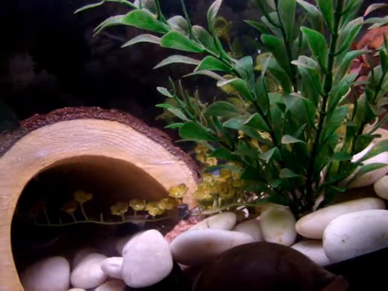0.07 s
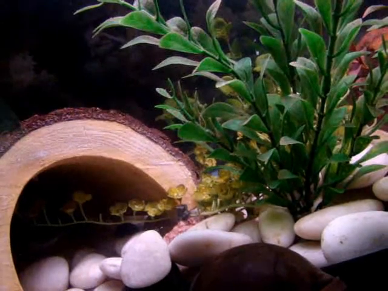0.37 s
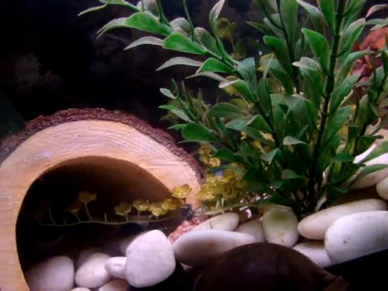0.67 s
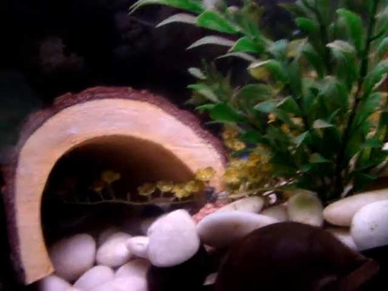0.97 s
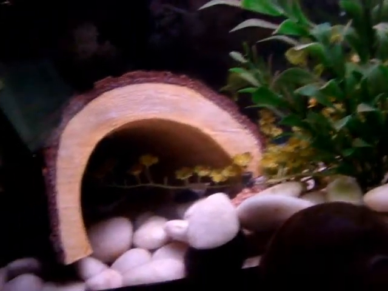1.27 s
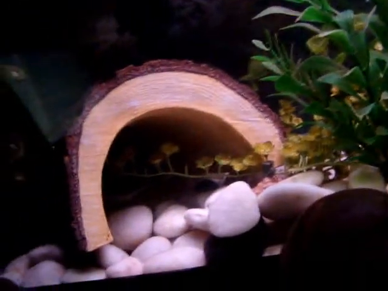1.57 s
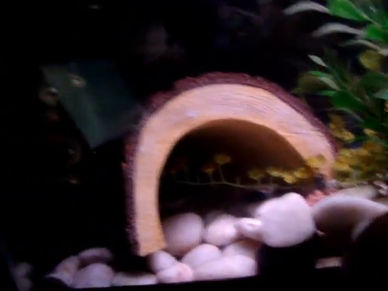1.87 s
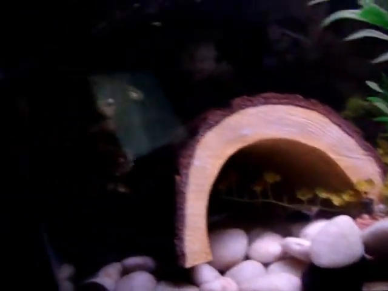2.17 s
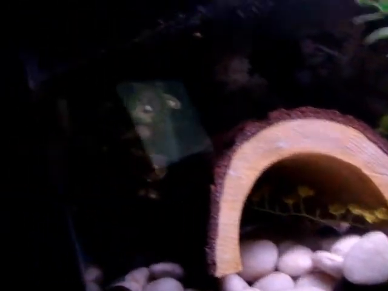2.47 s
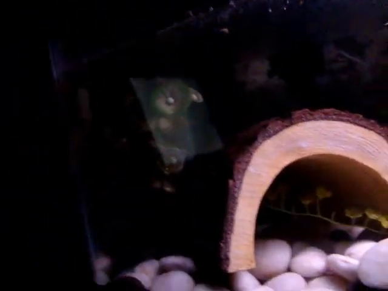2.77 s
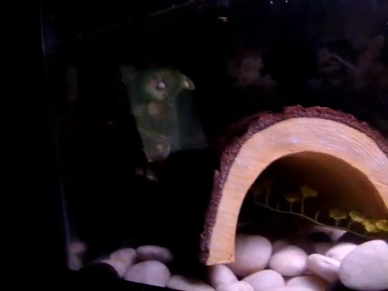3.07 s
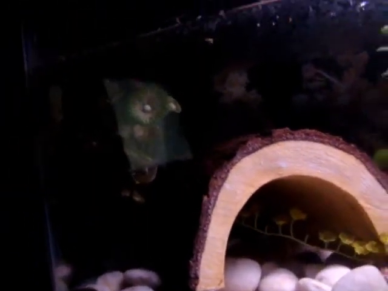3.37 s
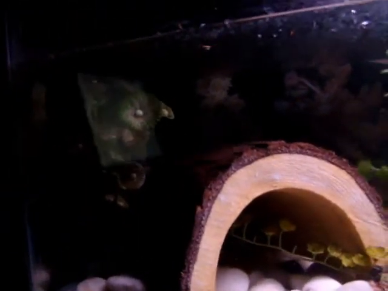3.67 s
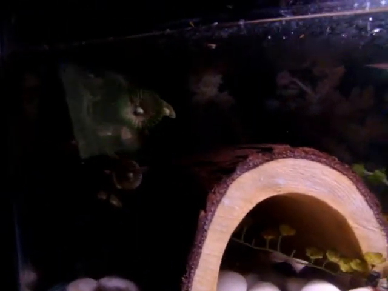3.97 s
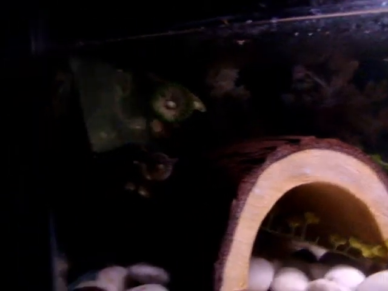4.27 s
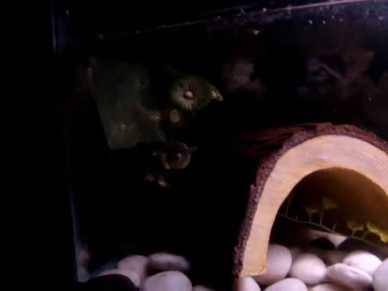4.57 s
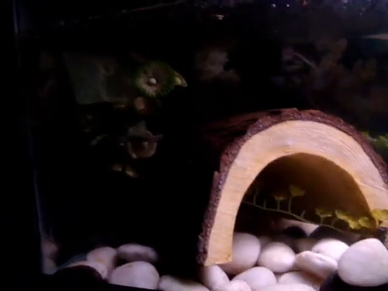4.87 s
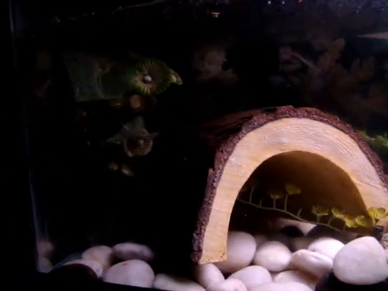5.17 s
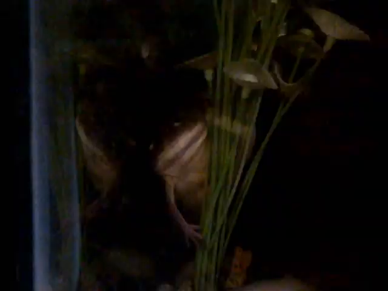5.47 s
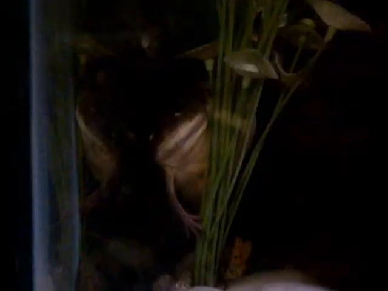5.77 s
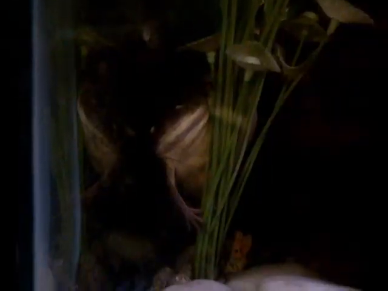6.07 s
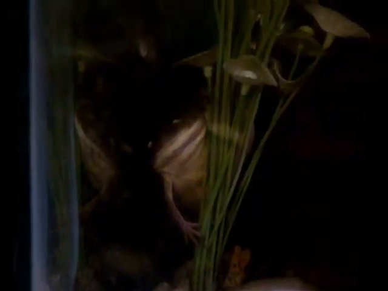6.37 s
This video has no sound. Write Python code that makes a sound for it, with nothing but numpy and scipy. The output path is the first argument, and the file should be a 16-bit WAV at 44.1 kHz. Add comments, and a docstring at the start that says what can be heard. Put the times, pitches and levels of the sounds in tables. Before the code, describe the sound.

Soft hiss and a low electric hum run throughout in a small room. Right away, aquarium frogs call with four brief, rattling trills, roughly one a second, each quickening and growing louder. Scattered taps and small clicks join from the second trill on. Near the end come the loudest sounds, a cluster of plastic clicks and knocks right at the handheld microphone and one sharp tap in the room.

```python
"""Hiss and mains hum lie under an aquarium in a small room, and a hand settles on a camera's case.
Clawed frogs call at once: four accelerating trills, about a second apart, each snap of the larynx
ringing the tank and the room. From the second trill on, taps sound in the room and the case clicks;
after five seconds the grip shifts, the case rattles and knocks hardest, and the level dips briefly.
All along, a quick wobble of the recorder's sampling mirrors every sound faintly into the high treble."""
import sys
import numpy as np
from scipy import signal
from scipy.fft import rfft, irfft, next_fast_len
from scipy.io import wavfile
from scipy.ndimage import uniform_filter1d

SR = 44100
rng = np.random.default_rng(int(sys.argv[2]) if len(sys.argv) > 2 else 0)


def materialize(psi):
    """Save the field psi as 16-bit PCM at rate SR to the path in sys.argv[1].

    A 1-D psi becomes a single channel; in a 2-D psi each row is a channel.
    """
    bounded = np.clip(np.atleast_2d(psi).T, -1, 1)
    quanta = np.round(bounded * 32767).astype(np.int16)
    wavfile.write(sys.argv[1], SR, quanta)


N = 292383
TIME = np.arange(N) / SR
HIT_TIME = TIME[:SR // 3]

# Tone of the room air and microphone hiss. Each row: frequency in Hz, relative level in dB.
AIR_CURVE = [(20, -21), (55, -13), (85, -17), (150, -6.5), (210, -4.5), (255, 1.5), (320, -2), (390, 0.5),
             (550, -2), (1100, -3), (1800, -7), (3500, -12), (6000, -15), (9900, -19.5)]
# The pump's mains hum and a faint electrical whine. Each row: frequency in Hz, rms level in dB.
HUM_TONES = [(120, -75.5), (240, -67), (360, -70), (720, -73.5), (5611, -78), (8000, -79)]
# Shifts of the grip. Each row: middle in seconds, half length in seconds, level in dB.
GRIP_SHIFTS = [(.01, 0.016, -47.5), (2.722, 0.066, -53), (5.355, 0.17, -53), (6.165, 0.13, -51),
               (6.57, 0.22, -52.5)]
# Ring of the camera case. Each row: frequency in Hz, relative level in dB, 60 dB decay in seconds.
CASE_RESONANCES = [(366, -17.5, 0.075), (598, -1.5, 0.016), (770, -7, 0.048), (1046, 8, 0.016),
                   (1246, -22, .25), (1430, -25, 0.31), (1465, 9.5, 0.022), (1677, -7.5, 0.046),
                   (2240, -10, 0.0056), (2768, 11.5, 0.015), (3160, -5, 0.033), (3740, 1.5, 0.016),
                   (5270, 8.5, 0.0062), (5750, 0, 0.012), (9400, -18, 0.01)]
# Soft bumps of the hand. Each row: start in seconds, level in dB.
HAND_BUMPS = [(0.021, -48), (.073, -39), (.086, -44), (2.922, -46), (2.985, -47), (3.027, -49),
              (3.077, -42)]
# Finger slides. Each row: middle and half length in seconds, centre and width in Hz, level in dB.
FINGER_SLIDES = [(2.94, 0.022, 1070, 1190, -51), (4.432, 0.05, 3400, 4600, -50.5),
                 (5.256, 0.0063, 5400, 1530, -40)]
# The frogs' trills. Each row: start, length and first gap in seconds, ratio of each gap to the one
# before, full level in dB.
FROG_TRILLS = [(.1095, .236, .0521, .8234, -34.5), (1.0585, .273, .0607, .7878, -33),
               (2.1995, .258, .0544, .8041, -34), (3.3305, .191, .0439, .8054, -32.5)]
# The note of a frog's snap, then the tank's modes. Each row: frequency in Hz, relative level in dB,
# 60 dB decay in seconds.
SNAP_AND_TANK_MODES = [(1907, 7.5, 0.006), (1806, -16.5, 0.058), (1744, -27, 0.079), (2090, -32.5, 0.13),
                       (2700, -30, 0.021)]
# Taps in the room. Each row: start in seconds, level in dB, centre and width in Hz, reverb send in dB.
ROOM_TAPS = [(1.174, -42.5, 2600, 1800, -8), (2.611, -32, 1440, 1900, -14), (2.671, -28.5, 1160, 1010, -3),
             (2.966, -34, 2360, 1800, -12), (3.480, -26.5, 1180, 553, 4), (3.488, -36.5, 1200, 500, 3),
             (4.537, -37.5, 5030, 5000, 2), (6.220, -15, 1860, 5000, -0.5), (6.327, -34.5, 3600, 4020, -17),
             (6.334, -32, 3600, 4000, -20), (6.491, -37, 2600, 4000, -20)]
# Tone of the tapped object. Each row: frequency in Hz, relative level in dB.
TAP_CURVE = [(65, -63), (110, -30), (235, 8.5), (289, 2.5), (632, -1), (776, 0.5), (1470, 2.5), (1590, 3),
             (2170, -1.5), (5590, -5.5), (11700, -21), (15000, -43)]
# Clicks of the case. Each row: start in seconds, level in dB, hardness in dB (more is brighter).
CASE_HITS = [(1.412, -40.5, -9), (1.479, -38.5, -12), (1.796, -24, -19), (2.211, -38, -7),
             (3.013, -36.5, -14), (5.305, -30.5, -22), (5.317, -34, -15), (5.349, -22, -18),
             (5.392, -9, 1.5), (5.432, -23, -11), (5.539, -6.5, -16), (5.937, -33, -14),
             (5.973, -32.5, -18), (6.156, -44, -17), (6.303, -14, -20), (6.585, -30, -21)]


def undb(db):
    """Decibels to gain."""
    return 10 ** (np.asarray(db) / 20)


def unit(x):
    """Scale to rms 1."""
    return x / np.sqrt(np.mean(x ** 2))


def unit_peak(x):
    """Scale a hit so that its envelope peaks at 1."""
    return x / np.sqrt(2 * uniform_filter1d(x ** 2, SR // 1000, mode="constant").max())


def add(out, s, sound):
    """Mix a sound in from time s on."""
    start = max(int(s * SR), 0)
    out[start:start + len(sound)] += sound[:N - start]


def colour(x, curve):
    """Causal EQ that follows a (Hz, dB) curve, built from the cepstrum."""
    size = next_fast_len(len(x) + SR // 10)
    size += size % 2
    hz, db = np.transpose(curve)
    gain = undb(np.interp(np.log(np.fft.rfftfreq(size, 1 / SR) + 1), np.log(hz), db))
    cepstrum = irfft(np.log(gain))[:size // 2]
    cepstrum[1:] *= 2
    return irfft(rfft(x, size) * np.exp(rfft(cepstrum, size)))[:len(x)]


def band(x, hz, width_hz):
    """One resonant band-pass."""
    return signal.lfilter(*signal.iirpeak(hz, hz / width_hz, fs=SR), x)


def lowpass(x, hz):
    """Steep high cut."""
    return signal.sosfilt(signal.ellip(10, .2, 70, hz, fs=SR, output="sos"), x)


def ring(hz, db, t60):
    """One struck mode: a decaying sine."""
    return undb(db - 60 * HIT_TIME / t60) * np.sin(2 * np.pi * hz * HIT_TIME)


def swell(s, half_s):
    """Bell-shaped fade in and out around time s."""
    return np.exp(-((TIME - s) / half_s) ** 2 / 2)


def room(t60, build_s):
    """Diffuse tail of the small room, energy 1; it builds as the first reflections arrive."""
    build_up = 1 - np.exp(-(HIT_TIME / build_s) ** 2)
    tail = rng.standard_normal(len(HIT_TIME)) * undb(-60 * HIT_TIME / t60) * build_up
    return tail / np.sqrt(np.sum(tail ** 2))


def hiss_and_hum(air_db=-51, air_top_hz=10000, whirr_hz=2770, whirr_db=-70):
    """The bed: smooth hiss with a narrow whirr in it, over the pump's steady hum."""
    air = unit(lowpass(colour(rng.standard_normal(N), AIR_CURVE), air_top_hz))
    whirr = unit(band(rng.standard_normal(N), whirr_hz, width_hz=55))
    hum = sum(undb(db) * np.sin(2 * np.pi * (hz * TIME + rng.random())) for hz, db in HUM_TONES)
    return undb(air_db) * air + undb(whirr_db) * whirr + np.sqrt(2) * hum


def case_ring(split_hz=2000):
    """Body and treble ring of the struck case; neighbouring modes swing in opposite directions."""
    modes = np.array([(-1) ** k * ring(*mode) for k, mode in enumerate(CASE_RESONANCES)])
    low = np.array(CASE_RESONANCES)[:, 0] < split_hz
    return unit_peak(modes[low].sum(axis=0)), unit_peak(modes[~low].sum(axis=0))


def grip_rattle(contacts_per_s=400, spread_db=6, treble_db=-8, boom_hz=455, boom_db=-7):
    """As the grip shifts, dense tiny contacts ring the camera's shell and boom in its hollow."""
    body, treble = case_ring()
    contacts = (rng.random(N) < contacts_per_s / SR) * undb(spread_db * rng.standard_normal(N))
    contacts *= rng.choice([-1, 1], N)
    shell = signal.fftconvolve(contacts, body + undb(treble_db) * treble)[:N]
    hollow = band(band(contacts, boom_hz, width_hz=140), boom_hz, width_hz=140)
    grip = sum(undb(db) * swell(s, half_s) for s, half_s, db in GRIP_SHIFTS)
    return (unit(shell) + undb(boom_db) * unit(hollow)) * grip


def hand(bump_hz=90, bump_t60=0.022):
    """The hand bumps the camera with dull thuds; sliding fingers add brief swishes of friction."""
    out = np.zeros(N)
    for s, db in HAND_BUMPS:
        add(out, s, ring(bump_hz, db, bump_t60))
    for s, half_s, hz, width_hz, db in FINGER_SLIDES:
        friction = unit(band(band(rng.standard_normal(N), hz, width_hz), hz, width_hz))
        out += undb(db) * friction * swell(s, half_s)
    return out


def stray_ticks(ticks_per_s=6, level_db=-47, spread_db=2):
    """The held case ticks softly at random, ringing only its body modes."""
    body, _ = case_ring()
    ticks = (rng.random(N) < ticks_per_s / SR) * undb(level_db - spread_db * rng.standard_normal(N))
    return signal.fftconvolve(ticks, body)[:N]


def trill(start, length, first_gap, gap_ratio, full_db, fastest_gap_s=.0135, first_db=-13.5, hold_s=.024):
    """Snaps as (s, dB): the larynx speeds up to its limit and swells to full level, then holds it."""
    steps = np.arange(np.ceil(length / fastest_gap_s))
    gaps = np.maximum(first_gap * gap_ratio ** steps, fastest_gap_s)
    times = np.r_[0, np.cumsum(gaps)]
    times = times[times < length + fastest_gap_s / 2]
    effort = np.interp(times, [0, length - hold_s], [undb(first_db), 1])
    return np.c_[start + times, full_db + 20 * np.log10(effort)]


def frogs(rise_s=0.0025, lead_s=0.00056, echo_s=0.012, echo_db=-12, room_db=-12,
          sharpen_hz_per_db=8, scatter_hz=15, scatter_db=0.6):
    """Each snap of the larynx swells for a few cycles and rings on in the tank; a wall returns it."""
    out = np.zeros(N)
    (note_hz, note_db, note_t60), *tank_modes = SNAP_AND_TANK_MODES
    tank_ring = sum(ring(*mode) for mode in tank_modes)
    attack = 1 - np.exp(-(HIT_TIME / rise_s) ** 2)
    snaps = np.vstack([trill(*row) for row in FROG_TRILLS])
    usual_db = np.median(snaps[:, 1])
    for s, db in snaps:
        detune, force = rng.standard_normal(2)
        # harder snaps sound a little higher; the tank's modes stay put
        hz = note_hz + sharpen_hz_per_db * (db - usual_db) + scatter_hz * detune
        snap = unit_peak((ring(hz, note_db, note_t60) + tank_ring) * attack)
        snap *= undb(db + scatter_db * force)
        add(out, s - lead_s, snap)
        add(out, s + echo_s, snap * undb(echo_db))
    return out + undb(room_db) * signal.fftconvolve(out, room(t60=0.27, build_s=0.0091))[:N]


def taps(trim_db=-1, crack_t60=0.039, rise_s=0.00047):
    """Short cracks, each trailed by the room and coloured by the thing that was touched."""
    out = np.zeros(N)
    envelope = undb(-60 * HIT_TIME / crack_t60) * (1 - np.exp(-HIT_TIME / rise_s))
    for s, db, hz, width_hz, send_db in ROOM_TAPS:
        crack = rng.standard_normal(len(HIT_TIME)) * envelope
        crack /= np.sqrt(np.sum(crack ** 2))
        tail = undb(send_db) * room(t60=0.25, build_s=0.0043)
        tap = band(colour(crack + tail, TAP_CURVE), hz, width_hz)
        add(out, s, undb(db + trim_db) * unit_peak(tap))
    return out


def case_clicks(trim_db=-1, edge_db=1, crack_db=-6, crack_t60=0.023, low_cut_hz=120):
    """Every click rings the case; hard contacts wake its upper modes and crack as the plastic gives."""
    out = np.zeros(N)
    body, treble = case_ring()
    for s, db, hardness_db in CASE_HITS:
        noise = rng.standard_normal(len(HIT_TIME))
        noise = band(band(noise, hz=2500, width_hz=2900), hz=2530, width_hz=3500)
        crack = unit_peak(noise * undb(-60 * HIT_TIME / crack_t60))
        edge = unit_peak(treble + undb(crack_db) * crack)
        add(out, s, undb(db + trim_db) * (body + undb(hardness_db + edge_db) * edge))
    # so small an object hardly radiates bass
    return signal.sosfilt(signal.butter(2, low_cut_hz, "highpass", fs=SR, output="sos"), out)


def scene():
    """The mono mix: frogs, handling noise and taps over the bed."""
    mix = frogs() + case_clicks() + stray_ticks() + grip_rattle() + taps() + hand() + hiss_and_hum()
    return mix[None]


def record(dry, wobble_hz=12085, wobble_db=-7, noise_db=-70, top_hz=15900,
           dip_start_s=5.562, dip_end_s=5.584, dip_db=-24):
    """Wobbling sampling adds mirror tones that follow the wave's slope; then a brief dip, a high cut."""
    mirror = undb(wobble_db) * np.gradient(dry, axis=1) * np.cos(2 * np.pi * wobble_hz * TIME)
    wet = dry + mirror + undb(noise_db) * rng.standard_normal(N)
    dip = np.where((TIME > dip_start_s) & (TIME < dip_end_s), undb(dip_db), 1)
    return lowpass(wet * uniform_filter1d(dip, size=64), top_hz)


dry = scene()
out = record(dry)
materialize(out)
```